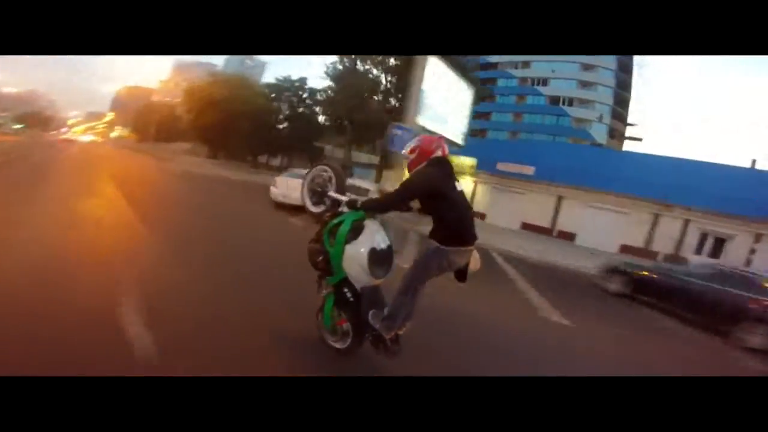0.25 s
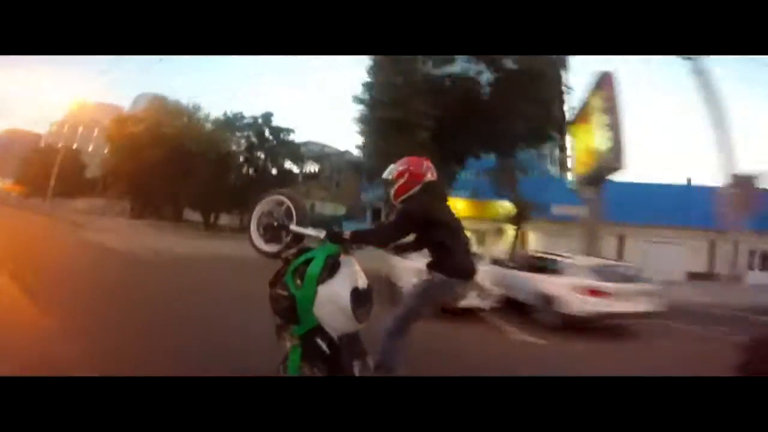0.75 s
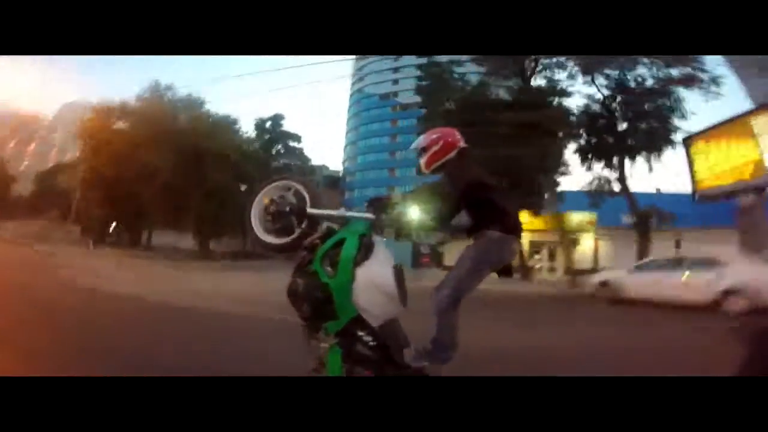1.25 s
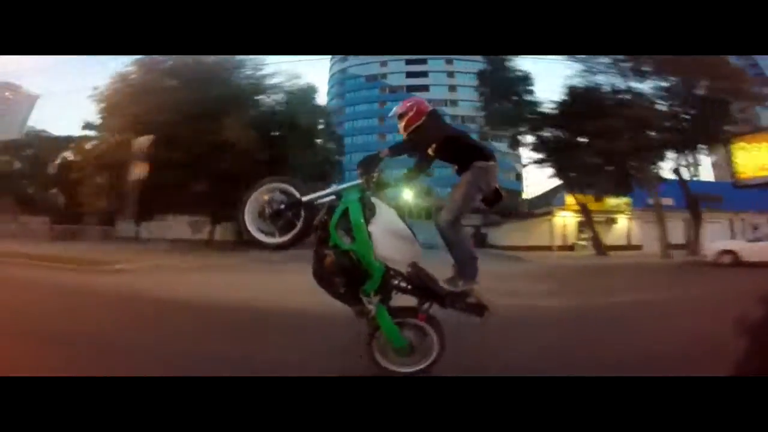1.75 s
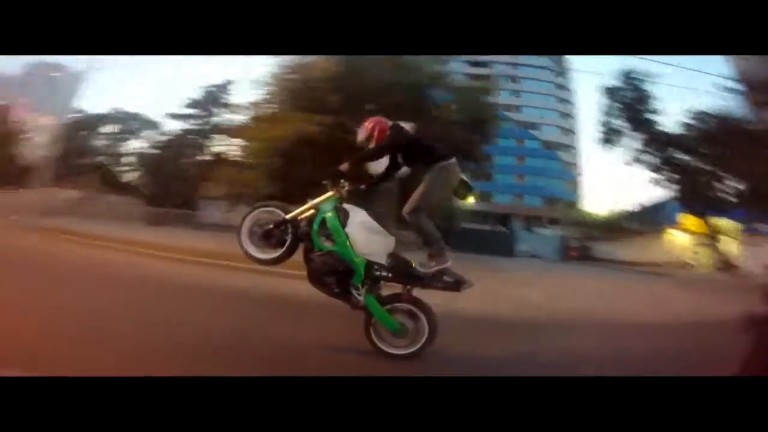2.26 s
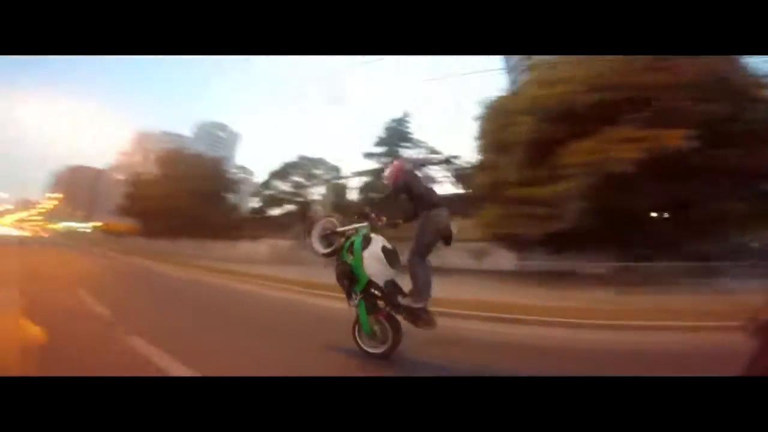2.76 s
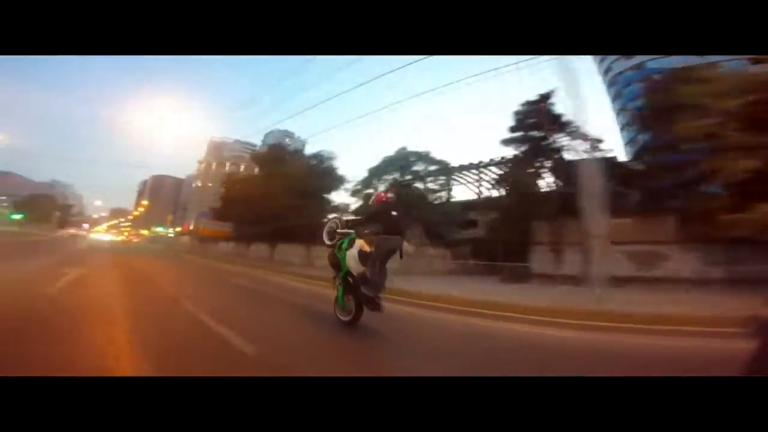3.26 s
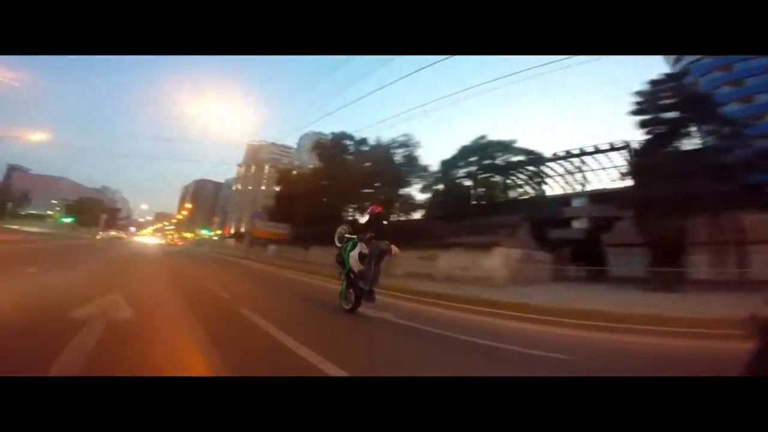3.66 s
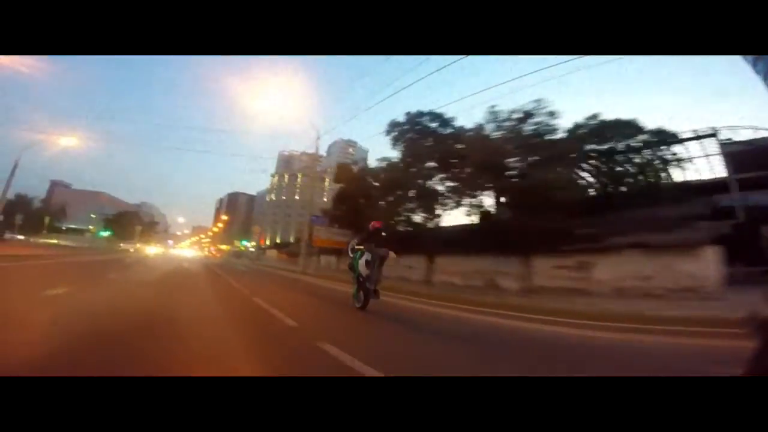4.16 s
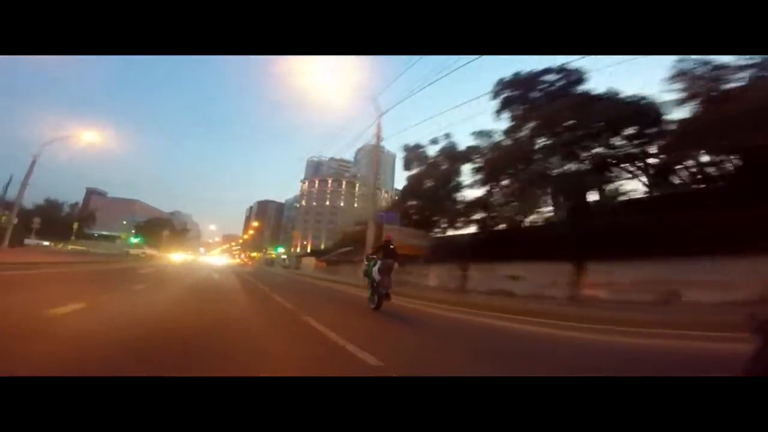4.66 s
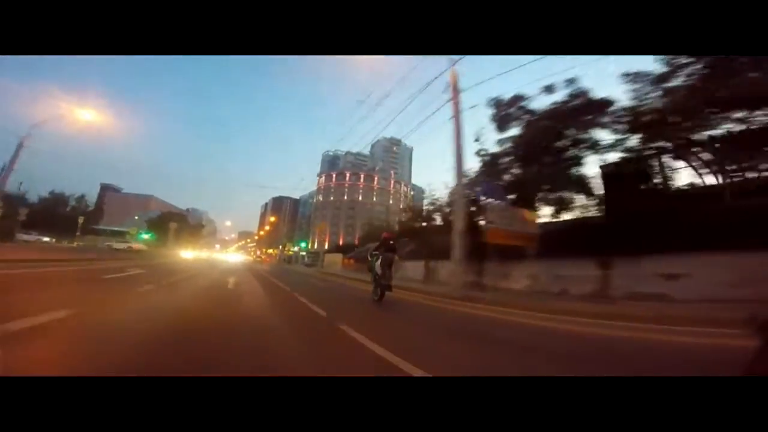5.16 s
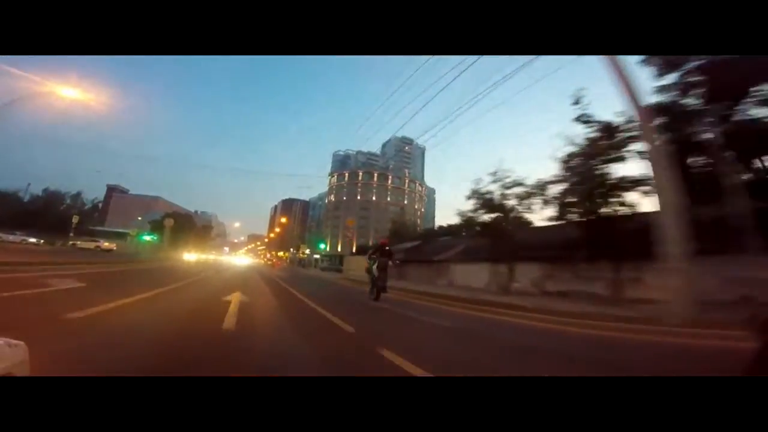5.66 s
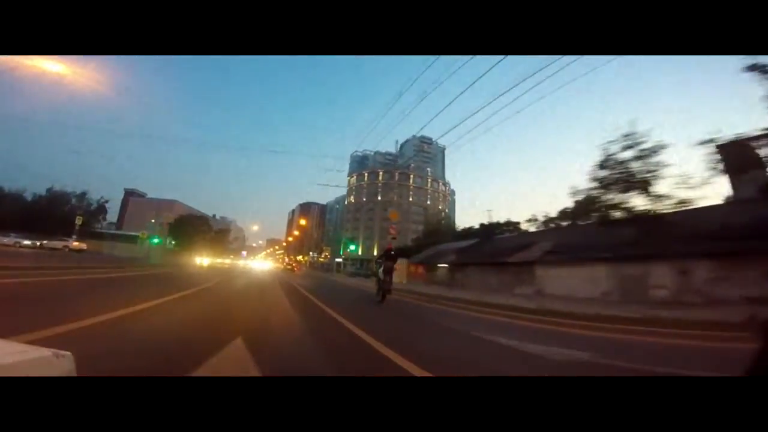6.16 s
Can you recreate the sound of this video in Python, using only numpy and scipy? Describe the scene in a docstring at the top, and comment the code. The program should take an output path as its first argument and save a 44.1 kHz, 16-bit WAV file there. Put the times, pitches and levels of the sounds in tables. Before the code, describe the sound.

Wind slaps and low buffeting hit an enclosed microphone while a motorcycle dips slightly, then revs hard. It hangs on a hoarse, chattering limiter for about a second, falls to roughly half pitch, wavers, then shoots up again. The same raspy, pulsing scream continues to the end as the bike rides away, light air rush beneath.

```python
"""A four-cylinder sport motorcycle revs to its limiter, drops, and revs to it again as it pulls away.
Sine tones at orders of the engine cycle ride on exhaust roar and hiss made of filtered noise.
On the limiter the ignition cuts twelve times a second: the shaft speed saws and the exhaust chops.
A closed camera case colours the engine with its resonance near 1.5 kHz.
Wind buffets the case: pressure pulses for the slaps, filtered noise for the buffeting and rush."""
import sys
import numpy as np
from scipy.fft import rfft, irfft, next_fast_len
from scipy.io import wavfile
from scipy.ndimage import uniform_filter1d, map_coordinates

SR = 44100
rng = np.random.default_rng(int(sys.argv[2]) if len(sys.argv) > 2 else 0)


def master(y):
    """Save y as 16-bit WAV."""
    cut = np.clip(np.atleast_2d(y).T, -1, 1)
    pcm = np.round(cut * 32767)  # scale
    wavfile.write(sys.argv[1], SR, pcm.astype(np.int16))


N = 282681

# mean engine cycles per second, one cycle = two turns: start_s, cycle_hz
CYCLE_SPEED = [(0, 49.26), (.3, 47.12), (.4, 44.73), (.46, 55.32), (.56, 78.07), (.64, 95), (.73, 111.1),
               (.78, 116.8), (1.81, 116.3), (1.93, 101.5), (2.12, 67.65), (2.2, 55.34), (2.25, 57.86),
               (2.37, 57.9), (2.64, 65.65), (2.79, 68.9), (3.04, 55.92), (3.09, 63.86), (3.21, 90.5),
               (3.3, 105), (3.38, 116.5), (4.3, 115.5), (6.41, 116.3)]
# stays on the limiter: first_cut_s, release_s, cut_rate_hz, chop_db (each layer takes its own share)
LIMITER_STAYS = [(0.782, 1.816, 12.02, 1.5), (3.399, 6.5, 12.0, 3)]
# exhaust balance: start_s, exhaust_db, orders_over_exhaust_db, order_brightness_db_per_octave
EXHAUST_BALANCE = [(0, -28, -6, 0), (.36, -30.5, -9, 2.5), (.44, -27.5, 5, -1), (.52, -25.5, 4, -1),
                   (.58, -23, 5.5, -7), (.66, -20, 6.5, -16), (.76, -18, -4, 13.5), (.84, -17.5, 7.5, 3),
                   (.95, -21, 7.5, 5), (1.17, -23, 8.5, 5.5), (1.45, -23, 10.5, 1), (1.8, -23, 8, -0.5),
                   (1.87, -25, 0.5, -0.5), (2.01, -26, 5.5, -2), (2.06, -31, -1, -6),
                   (2.16, -30.5, 4.5, -3), (2.24, -31, 4, 3), (2.34, -29.5, 5, 3), (2.46, -29.5, 8.5, 1),
                   (2.54, -28.5, 8.5, -5.5), (2.6, -30, 8.5, -5), (2.8, -28.5, 6.5, -9.5),
                   (2.9, -29.5, 0, -3), (3.04, -32, 4, -9.5), (3.07, -34.5, 18, -1.5), (3.11, -30, 11, -3),
                   (3.16, -25.5, 5.5, -11), (3.24, -24, 11.5, -7.5), (3.33, -24.5, 12, -14.5),
                   (3.4, -24.5, 10, -0.5), (4.2, -24.5, 11.5, 0.5), (4.9, -26, 12, -1.5),
                   (5.4, -25, 10.5, -3.5), (6.41, -27, 6.5, -3.5)]
# base levels of the orders above the 7th: order, low_speed_db, high_speed_db, on_limiter_db
UPPER_ORDERS = [(8, -3, -13, -4), (10, -19, -10, -5.5), (11, -24, -15, -16), (12, 2, 0, -4.5),
                (13, -32, -27, -13), (14, -17, -2, -4), (15, -15, -7, -7), (16, 1.5, 6.5, -4),
                (17, -10, -11, -2.5), (18, -13, -1, -2), (20, 0, 4, -18), (22, -27, -12, 1),
                (24, 3, -5, -6.5), (26, -21, -6, -1), (28, 1, -9, 1), (30, -20, -6, 0.5),
                (32, -3.5, -11, 2), (34, -10, 1, 2), (36, 2, -1, 7.5)]
# swells of the 12th order, heard on the limiter: start_s, swell_db
TWELFTH_SWELLS = [(.9, -10), (1.04, 3.5), (1.4, -1), (1.52, 6.5), (1.72, 8.5), (1.82, 4), (3.5, 1.5),
                  (3.8, 2), (4.0, -1), (4.2, -2), (4.7, 1), (5.0, -7.5), (5.25, -3), (5.5, 6), (5.84, 2),
                  (6.1, 10), (6.41, 2.5)]
# mean rms of the firing tone, the 4th order: start_s, level_db
FIRING_LEVEL = [(0, -44), (.2, -36), (.36, -38.5), (.47, -25.5), (.54, -34.5), (.66, -16.5), (.8, -37),
                (1.8, -36.5), (2.01, -34), (2.1, -41.5), (2.35, -40), (2.65, -33), (3.15, -33.5),
                (3.27, -29), (3.45, -33), (4.2, -35.5), (4.45, -39.5), (4.9, -34), (5.2, -36.5),
                (5.6, -45.5), (5.9, -36.5), (6.41, -39.5)]
# companions of the 5th order: order, over_fifth_db
FIFTH_COMPANIONS = [(2, -19), (3, -16), (6, -19), (7, -15), (9, -17)]
# broad response of the camera case: frequency_hz, gain_db
CASE_RESPONSE = [(200, -27.5), (650, -25), (1050, -23.5), (1220, -15.5), (1330, -9.5), (1420, 0),
                 (1500, 1.5), (1650, -5.5), (1880, -19), (2100, -17), (2330, -24), (2480, -17), (4050, -22),
                 (4400, -45)]
# small resonances of the case: centre_hz, width_hz, gain_db
CASE_PANELS = [(2360, 290, 1), (2893, 230, 4.5), (3420, 85, 5), (3770, 33, 2.5)]
# spectrum of the exhaust hiss through the case: frequency_hz, gain_db
HISS_SPECTRUM = [(4200, 0), (5100, -5), (6200, 3), (7600, -7.5), (8600, -5.5), (9600, -13.5), (12200, -21),
                 (13000, -24), (15200, -28)]
# exhaust colour, before fixed trims: start_s, hiss_db and case_ring_db, both over exhaust_db
EXHAUST_COLOUR = [(0, -13, 3), (.46, -13, 3), (.55, -9, 11), (.68, -9.5, -3), (.8, -8.5, 0.5), (1.0, -7, 5),
                  (1.7, -7.5, 0.5), (1.87, -9.5, 3), (2.1, -8.5, 4.5), (2.44, -7, 8), (2.56, -6, 3),
                  (2.68, -4.5, 5), (2.95, -12, 8), (3.04, -10, 7.5), (3.07, -6, 10), (3.1, -9, 10),
                  (3.14, -11.5, 17.5), (3.19, -10.5, 10.5), (3.36, -9.5, 7), (3.6, -7, 7), (4.8, -8, 8.5),
                  (5.3, -8, 4), (6.41, -9.5, 11)]
# rms of the wind layers: start_s, buffet_db, rush_db
WIND_LEVELS = [(0, -27, -30.5), (.15, -34, -31.5), (.45, -24.5, -29.5), (.7, -37, -30.5), (.95, -38, -47),
               (1.2, -40.5, -38), (1.45, -34, -56), (1.9, -47, -41), (2.66, -38.5, -40), (2.85, -39, -36),
               (3.4, -44, -41.5), (4.2, -41, -37), (4.5, -48, -37.5), (5.4, -41, -36.5), (6.0, -40, -37),
               (6.41, -46, -41)]
# spectrum shape of the low buffeting: frequency_hz, relative_density_db
BUFFET_SPECTRUM = [(10, 3), (28, -7), (45, -3), (70, -11)]
# spectrum shape of the air rush: frequency_hz, relative_density_db
RUSH_SPECTRUM = [(30, -14), (55, -5.5), (150, -3), (260, -7.5), (340, -8), (900, -16.5)]
# gusts that slap the case: centre_s, peak_of_full_scale, half_width_s (standard deviation)
GUST_SLAPS = [(.32, -0.12, 0.0081), (.348, -0.18, 0.0066), (.438, -0.2, 0.012), (0.477, 0.26, 0.0031),
              (.517, -0.16, 0.0063), (.565, 0.18, 0.0062), (.62, -.14, 0.008), (.662, 0.067, .012),
              (.693, -0.26, 0.01), (.762, -0.099, 0.0043), (.828, 0.044, 0.007), (.89, -0.068, 0.012),
              (.915, -0.014, .012), (1.093, 0.03, 0.0089)]

# 5th order: level with all cylinders firing, level on the limiter, change once far, steady fade
FIFTH_FREE_DB, FIFTH_CUT_DB, FIFTH_FAR_DB, FIFTH_FADE_DB_PER_S = -61, -30.5, -7.5, -.7
LEAVES_S, LEAVING_S = 4.127, 0.32  # the bike turns distant from here, over this long
FAST_FROM_HZ, FAST_OVER_HZ = 65.5, 29.7  # cycle speeds that turn orders from low- to high-speed levels
EIGHTH_FAR_DB = -9  # change of the 8th order once far
TOP_HZ = 15250  # band limit


def amp(db):
    """Turns decibels into a linear gain."""
    return 10 ** (np.asarray(db) / 20)


def unit(x):
    """Scales x to an rms of one."""
    return x / np.sqrt(np.mean(x ** 2) + 1e-20)


def curves(rows):
    """One value per sample for each column after the time."""
    s, *cols = np.transpose(rows)
    return [np.interp(np.arange(N) / SR, s, c) for c in cols]


def wobble(rate):
    """A smooth random curve, rate knots a second."""
    knots = rng.standard_normal(int(N * rate / SR) + 4)
    return map_coordinates(knots, [np.arange(N) * rate / SR])


def filtered(x, response):
    """Shapes x with a response of frequency."""
    m = next_fast_len(N + 8192)
    return irfft(rfft(x, m) * response(np.fft.rfftfreq(m, 1 / SR)), m)[..., :N]


def colour(points):
    """The gain of (Hz, dB) points on a log axis, silent far above the last."""
    f, db = np.transpose(points + [(points[-1][0] * 2, -120)])
    return lambda hz: amp(np.interp(np.log(hz + 1), np.log(f), db))


def noise(response):
    """White noise shaped by a response of frequency."""
    return filtered(rng.standard_normal(N), response)


def case(hz):
    """The gain of the camera case: a broad response with small panel resonances on top."""
    panels_db = sum(db * np.exp(-((hz - c) / w) ** 2) for c, w, db in CASE_PANELS)
    return colour(CASE_RESPONSE)(hz) * amp(panels_db)


def engine():
    """The shaft drives tones at orders of its cycle over turbulent exhaust gas."""
    on, saw, chop_db = limiter(cut_share=0.556)
    chop_db = chop_db * np.clip(1 + .35 * wobble(6), .3, 1.6)  # some cuts bite deeper than others
    far = np.clip((np.arange(N) / SR - LEAVES_S) / LEAVING_S, 0, 1)
    speed_hz, = curves(CYCLE_SPEED)
    shaft_hz = speed_hz + 1.87 * saw + 0.224 * wobble(30)
    cycle = 2 * np.pi * np.cumsum(shaft_hz) / SR
    tones = firing_tones(cycle, speed_hz, on, chop_db, far)
    upper = upper_orders(cycle, speed_hz, on, chop_db, far)
    return tones + upper + exhaust_gas(cycle, chop_db, far)


def tone(order, cycle, db, blur=0):
    """A sine at an order of the engine cycle, db in rms; blur shifts its phase in radians."""
    return np.sqrt(2) * amp(db) * np.sin(order * cycle + blur + rng.uniform(0, 2 * np.pi))


def firing_tones(cycle, speed_hz, on, chop_db, far):
    """Four firings a cycle give the 4th order; missing firings fill in the orders around it."""
    # street echoes break up the tones as the bike leaves: their phase wanders once far
    firing_db = curves(FIRING_LEVEL)[0] + (1.5 + 1.5 * on) * wobble(45) + 2.5 * far * chop_db
    tones = tone(4, cycle, firing_db, .6 * far * wobble(35))
    # unevenness also comes in at high speed
    uneven = np.maximum(on, np.clip((speed_hz - 95) / 21, 0, 1))
    fifth_db = FIFTH_FREE_DB + uneven * (FIFTH_CUT_DB - FIFTH_FREE_DB)
    fifth_db += far * FIFTH_FAR_DB + FIFTH_FADE_DB_PER_S * np.arange(N) / SR
    flutter_db = (1.1 + 1.8 * far) * wobble(30) + .6 * wobble(4)
    tones += tone(5, cycle, fifth_db + flutter_db + 0.25 * chop_db, .7 * far * wobble(35))
    for order, db in FIFTH_COMPANIONS:
        tones += tone(order, cycle, fifth_db + db + 2.5 * wobble(12))
    return tones


def upper_orders(cycle, speed_hz, on, chop_db, far):
    """Higher orders of the cycle, rebalanced by speed and limiter, through silencer and case."""
    exhaust_db, orders_db, bright_db = curves(EXHAUST_BALANCE)
    twelfth_db, = curves(TWELFTH_SWELLS)
    fast = np.clip((speed_hz - FAST_FROM_HZ) / FAST_OVER_HZ, 0, 1)
    # the tones break up more while the speed changes fast, and once far
    speed_change = np.clip(np.abs(np.gradient(speed_hz)) * SR / 120, 0, 1)
    flutter_db = 1.8 + 2.5 * speed_change + 1.3 * far
    upper = np.zeros(N)
    for order, low, high, cut in UPPER_ORDERS:
        order = round(order)
        level_db = low + fast * (high - low) + on * (cut - high)
        level_db += bright_db * np.log2(order / 12)  # brightness tilts around the 12th
        if order == 8:
            level_db += far * EIGHTH_FAR_DB
        if order == 12:
            level_db += on * twelfth_db
        level_db += flutter_db * np.minimum(wobble(24), .9) + 0.39 * wobble(4.878)
        upper += tone(order, cycle, level_db)

    def pipe(hz):
        """The silencer dulls the higher orders before the case colours them."""
        return case(hz) * amp(-5 * np.log2((hz + 50) / 1500))

    return filtered(amp(exhaust_db + orders_db + (1.04 + 1.0 * far) * chop_db) * upper, pipe)


def exhaust_gas(cycle, chop_db, far):
    """Gas bursts out once a firing, one cylinder a little stronger, as roar and hiss."""
    exhaust_db = curves(EXHAUST_BALANCE)[0]
    hiss_db, ring_db = curves(EXHAUST_COLOUR)
    pulses = 1 + 0.066 * np.cos(4 * cycle) + 0.035 * np.cos(cycle)
    gas = amp(exhaust_db + 0.27 * chop_db + 0.37 * wobble(17)) * pulses
    return gas * (exhaust_roar(ring_db, chop_db, far) + exhaust_hiss(hiss_db, chop_db))


def exhaust_roar(ring_db, chop_db, far):
    """Turbulence noise through the case, with the band its resonance lifts set apart."""
    roar = unit(noise(case))
    # turbulence is weak in the lows
    roar = filtered(roar, lambda hz: amp(-4.5 / (1 + (hz / 1150) ** 8)))
    ring = filtered(roar, lambda hz: np.exp(-((hz - 1520) / 330) ** 4))
    return amp(8.5) * (roar - ring) + amp(ring_db + 1.0 * far * chop_db) * ring


def exhaust_hiss(hiss_db, chop_db):
    """Treble noise of the gas; the first firing after a cut burns waiting fuel with a bright spit."""
    level_db = hiss_db + 0.5 + 0.76 * chop_db + 0.56 * wobble(22)
    hiss = amp(level_db) * unit(noise(colour([(22, -120)] + HISS_SPECTRUM)))
    pressure_return = np.clip(np.gradient(chop_db) * SR / 400, 0, 3)
    spit = pressure_return * np.clip(wobble(6), 0, 2)  # of random strength
    spit_db = np.clip(3.2 * uniform_filter1d(spit, size=600), 0, 4)
    # the cut dulls the very top most
    top = filtered(hiss, lambda hz: 1 / (1 + (8500 / (hz + 1)) ** 4))
    return hiss + (amp(spit_db + 0.97 * chop_db + 0.9) - 1) * top


def wind():
    """Gust slaps and lumpy low buffeting on the case over a steadier rush of air."""
    t = np.arange(N) / SR
    buffet_db, rush_db = curves(WIND_LEVELS)
    slaps = sum(peak * np.exp(-.5 * ((t - s) / width) ** 2) for s, peak, width in GUST_SLAPS)
    buffet = noise(colour([(3, -40)] + BUFFET_SPECTRUM))
    buffet *= amp(2.7 * wobble(18) + 0.88 * wobble(5))
    rush = noise(colour([(4, -60)] + RUSH_SPECTRUM))
    rush *= amp(1.3 * wobble(28.0) + 1.1 * wobble(4.23))
    return slaps + amp(buffet_db) * unit(buffet) + amp(rush_db) * unit(rush)


def limiter(cut_share):
    """On the limiter (0-1), speed saw (-1 to 1) and the fall of exhaust pressure (dB) through each cut."""
    t = np.arange(N) / SR
    on, saw, chop_db = np.zeros((3, N))
    cut_share = np.clip(cut_share, .1, .9)
    for start, release, rate, depth_db in LIMITER_STAYS:
        inside = (t >= start) & (t < release)
        place = (t - start) * rate % 1  # 0-1 through each cut and recovery
        on += inside
        # the shaft slows while the spark is cut and climbs back once it returns
        saw += inside * np.interp(place, [0, cut_share, 1], [1, -1, 1])
        chop_db -= inside * depth_db * np.where(place < cut_share, place / cut_share, 0)
    on = uniform_filter1d(on, size=2000)
    saw = uniform_filter1d(saw, size=400)
    return on, saw, uniform_filter1d(chop_db, size=200)


def scene():
    """The motorcycle and the wind, in one channel."""
    return (engine() + wind())[None]


def record(dry):
    """The preamp rounds off the highest peaks; nothing is kept above the band limit."""
    rounded = dry / (1 + np.abs(dry / .95) ** 6) ** (1 / 6)
    return filtered(rounded, lambda hz: (hz > 3) & (hz < TOP_HZ))


dry = scene()
out = record(dry)
master(out)
```